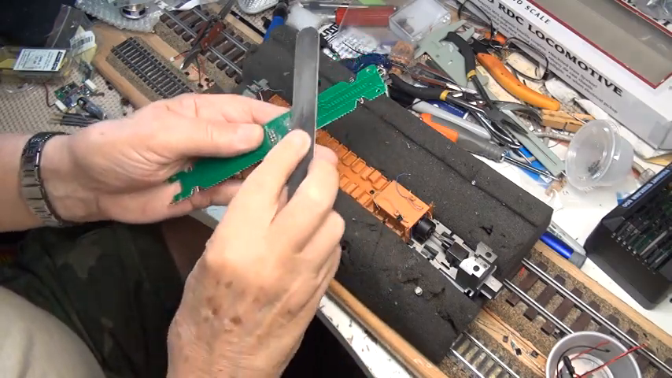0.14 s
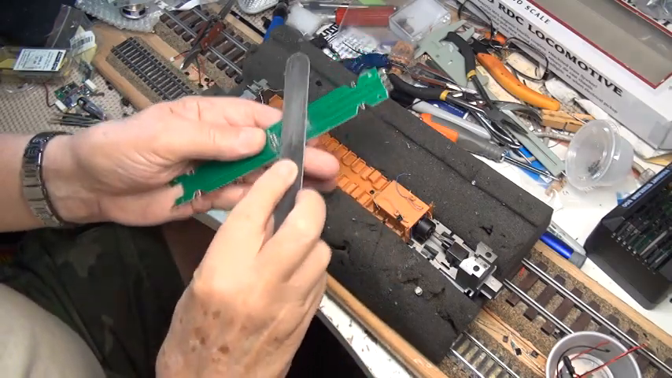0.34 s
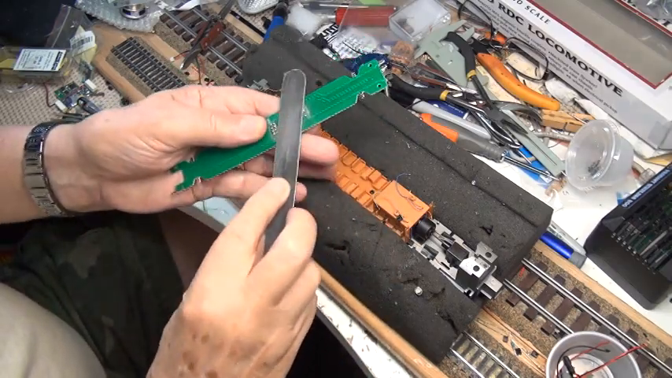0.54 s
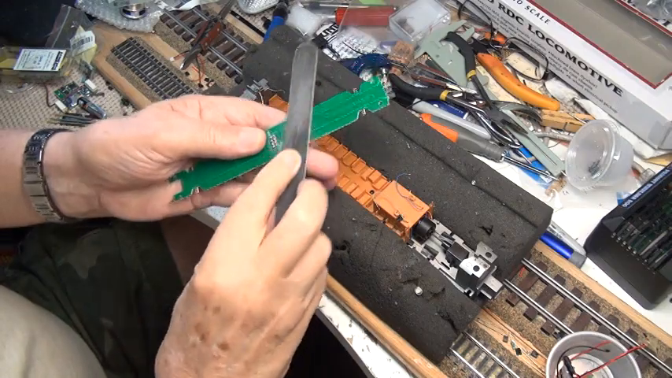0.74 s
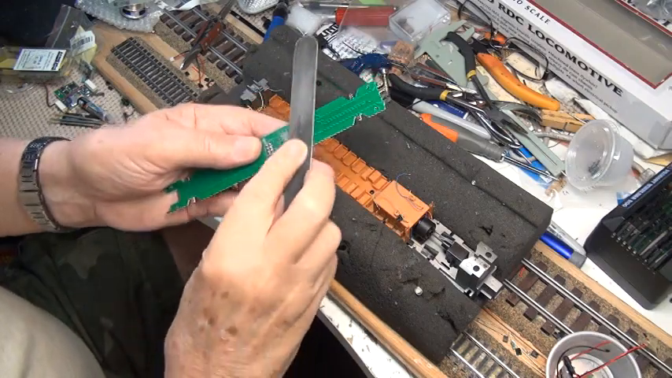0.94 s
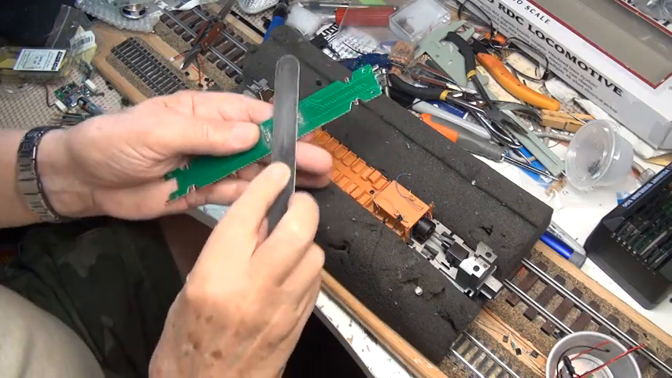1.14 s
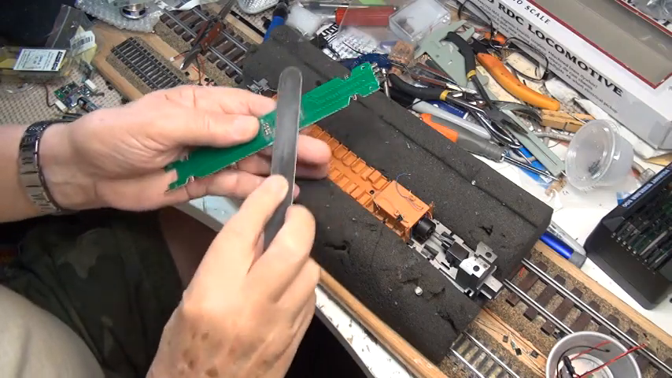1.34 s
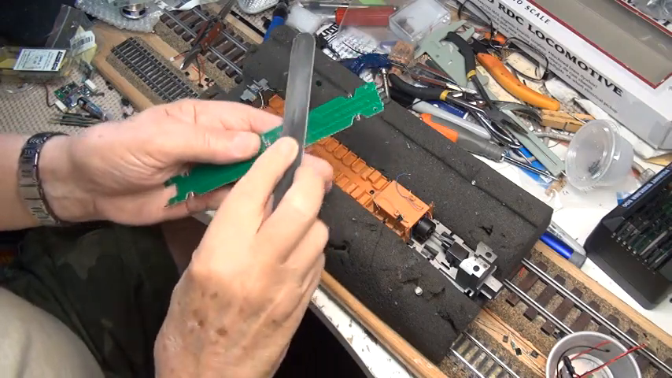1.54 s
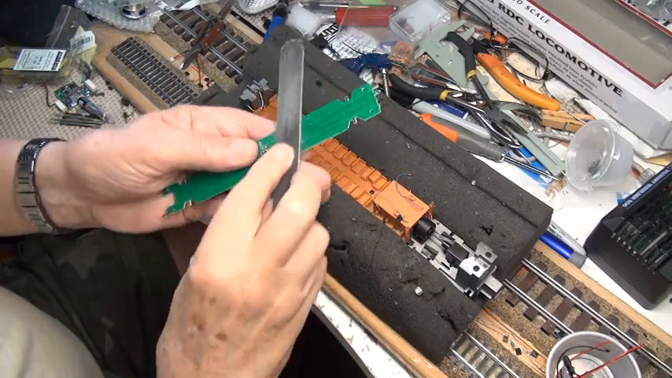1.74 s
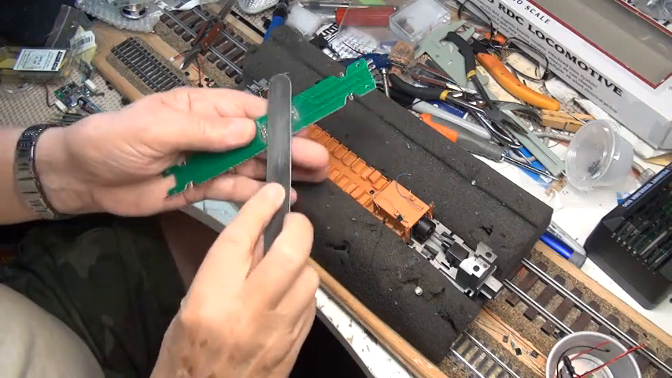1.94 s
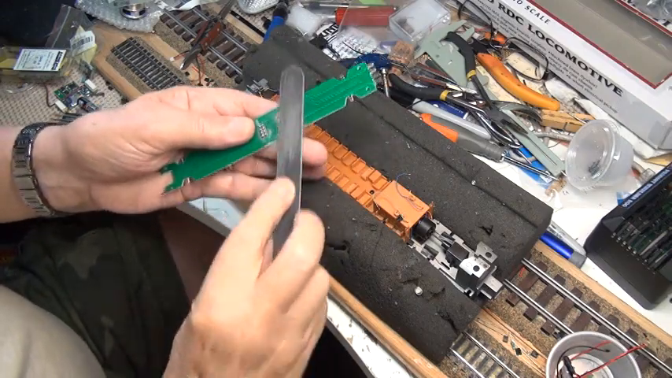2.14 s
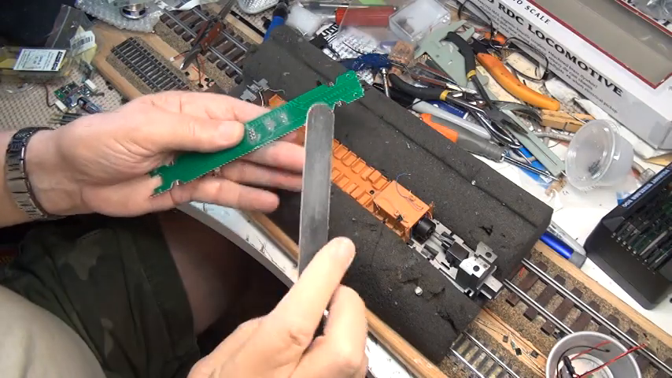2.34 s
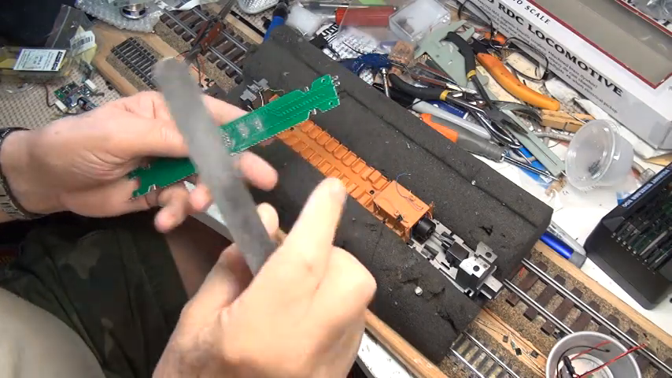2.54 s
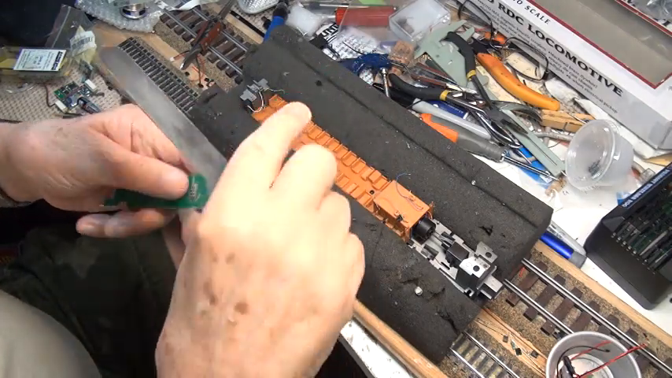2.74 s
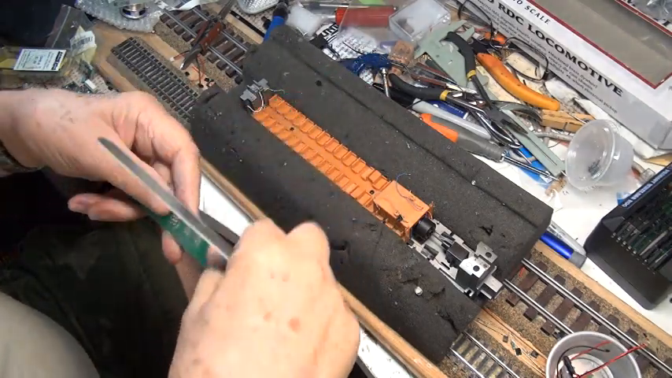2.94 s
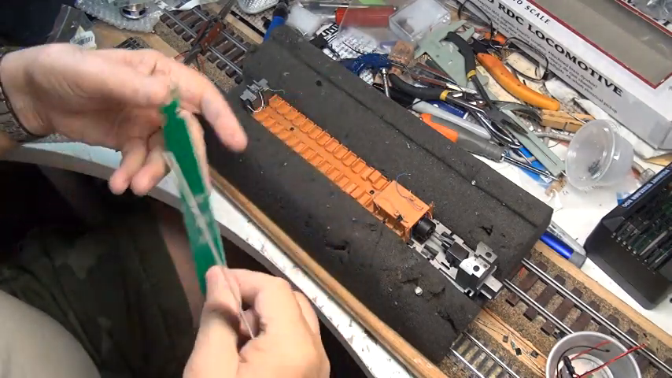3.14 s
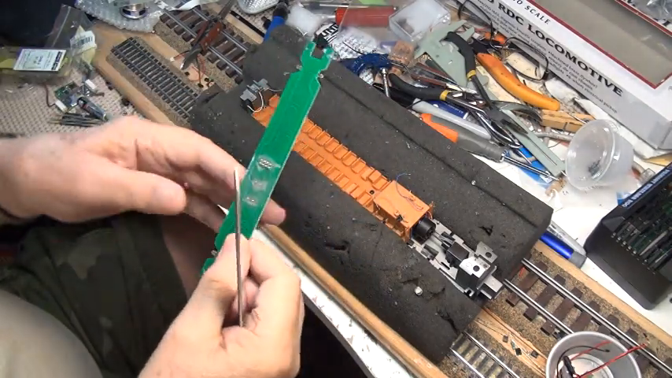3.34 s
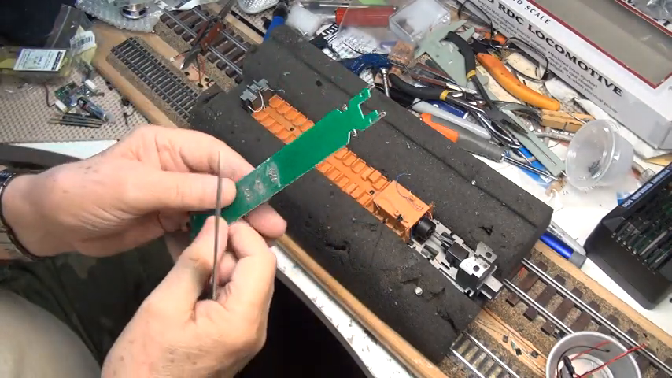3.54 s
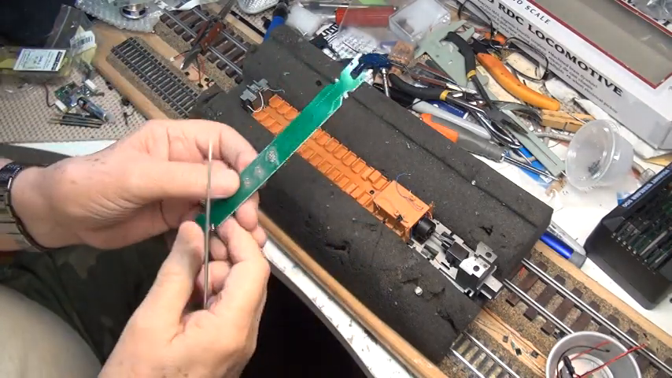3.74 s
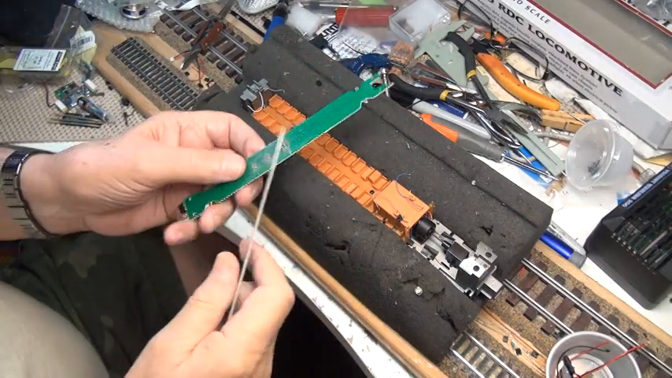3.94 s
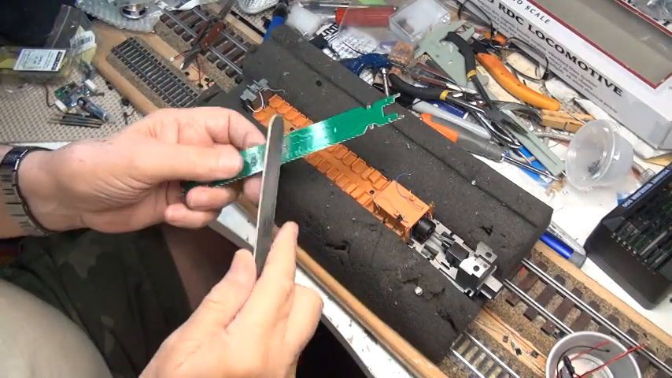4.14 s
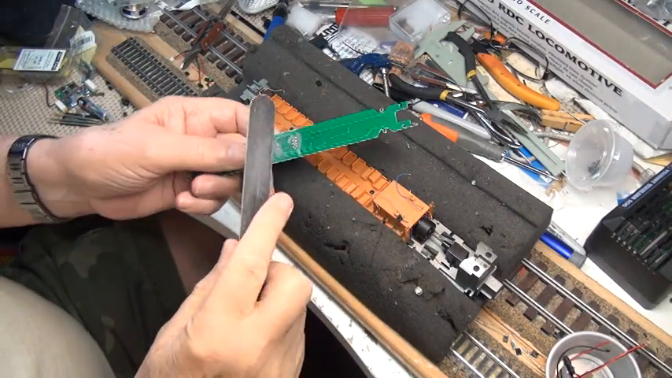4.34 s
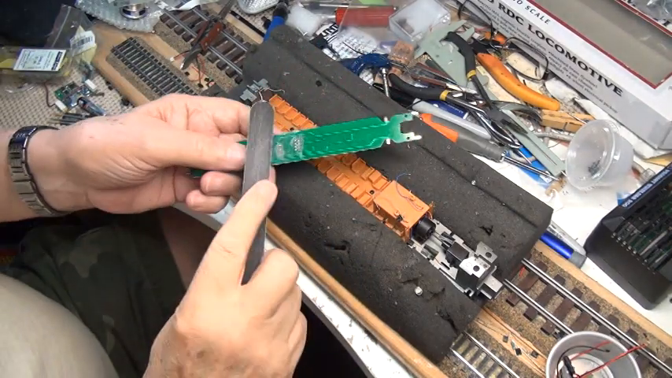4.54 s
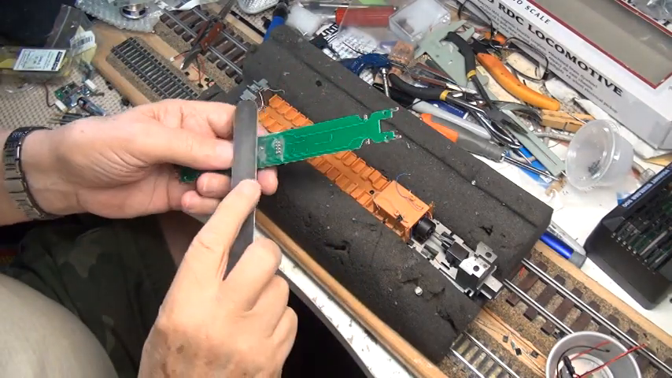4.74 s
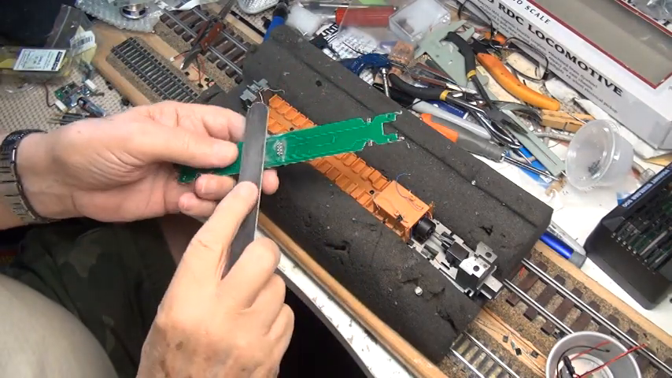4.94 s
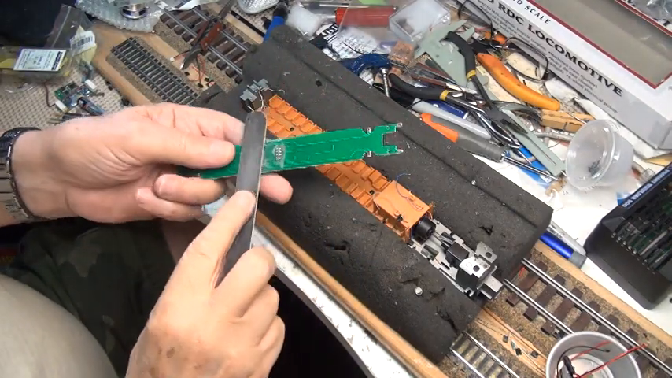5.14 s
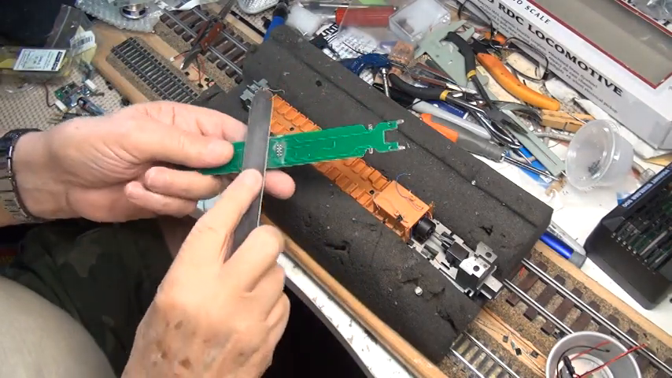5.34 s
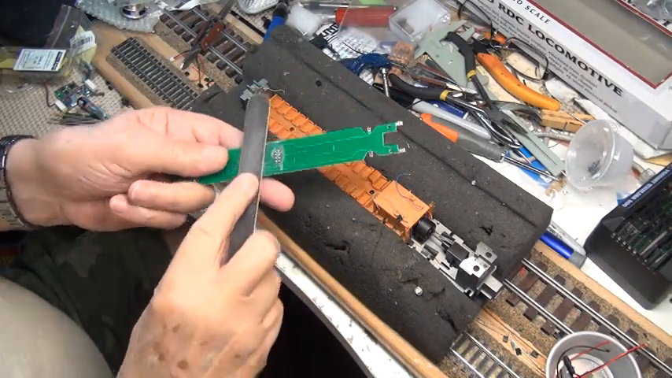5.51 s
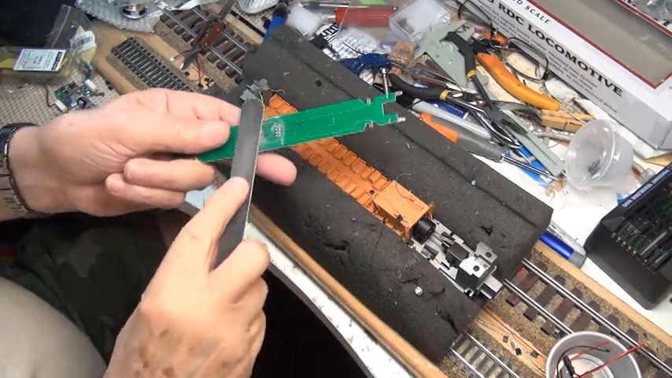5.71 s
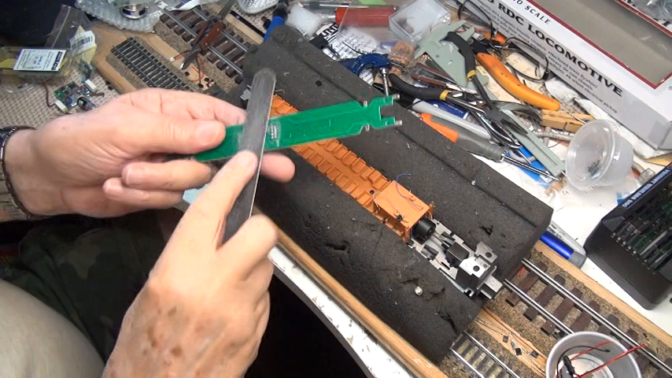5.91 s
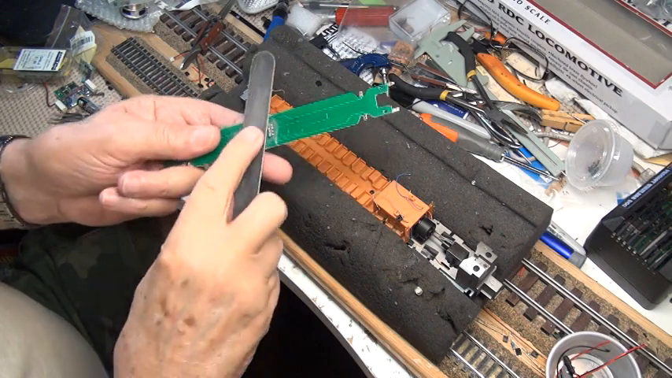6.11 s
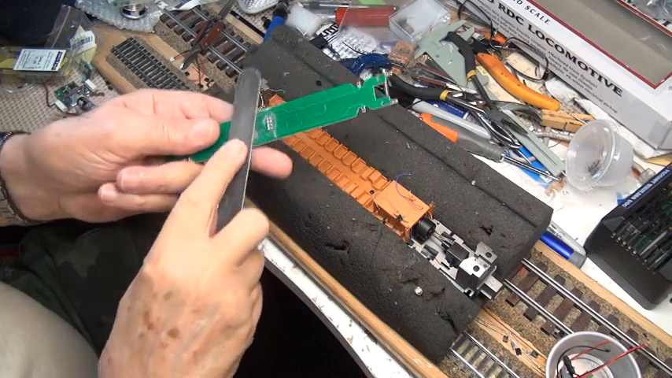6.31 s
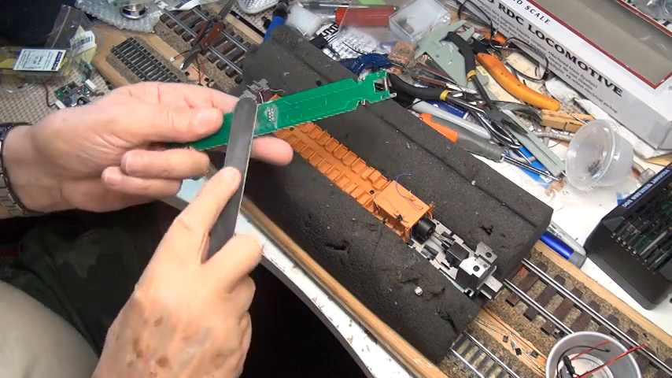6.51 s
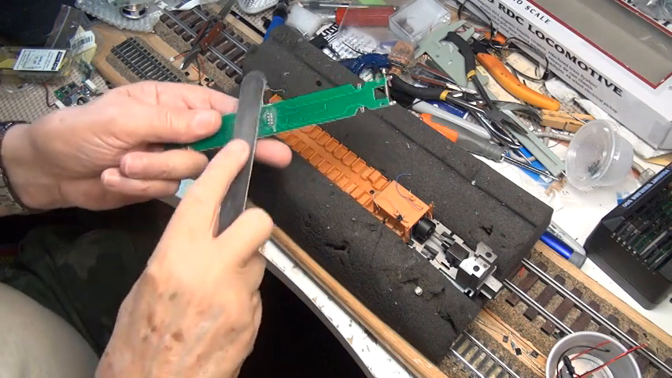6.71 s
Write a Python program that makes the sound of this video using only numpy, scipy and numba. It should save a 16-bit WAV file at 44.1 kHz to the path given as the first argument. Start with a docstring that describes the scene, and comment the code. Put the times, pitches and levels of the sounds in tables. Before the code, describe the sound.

A flat steel file rasps rapidly to and fro over wire ends on a hand-held circuit board, pauses for light handling, then resumes.

```python
"""Steel file on a circuit board

A flat steel file is rubbed to and fro over the wire ends of a hand-held circuit board, close to the listener.
Its teeth rasp as random clicks and hiss, and moving resonances make the blade's pitch glide along each stroke.
In a pause the board is turned and the file feels for a new seat, with light brushes and short noisy snags.
Echoes of fading noise make the small room; soft noise, a faint hum and a thin whine hang behind."""
import sys
import numpy as np
from scipy import signal
from scipy.fft import rfft, irfft, next_fast_len
from scipy.io import wavfile
from scipy.ndimage import uniform_filter1d, map_coordinates
from numba import njit

SR = 44100
rng = np.random.default_rng(int(sys.argv[2]) if len(sys.argv) > 2 else 0)


def persist_wave(psi):
    """Save psi, clipped to +-1, as 16-bit WAV."""
    counts = np.round(np.clip(psi, -1, 1) * 32767).astype(np.int16)
    wavfile.write(sys.argv[1], SR, np.atleast_2d(counts).T)


N = 298557  # length of the sound [samples]
REGRIP_S = 3.5  # strokes after this time use the second grip


def amp(db):
    """Turn decibels into a gain."""
    return 10 ** (np.asarray(db) / 20)


def unit(x):
    """Scale to an rms of 1."""
    return x / np.sqrt(np.mean(x ** 2) + 1e-20)


def along(points, hz):
    """Read a curve of (frequency [Hz], value) points, joined by straight lines on a log axis."""
    point_hz, values = np.transpose(points)
    return np.interp(np.log(hz + 1), np.log(point_hz + 1), values)


def clock():
    """Time of every sample [s]."""
    return np.arange(N) / SR


def wobble(rate):
    """A smooth random curve with the given number of random points a second."""
    knots = rng.standard_normal(int(N * rate / SR) + 4)
    return map_coordinates(knots, [clock() * rate])


def filtered(x, response):
    """Multiply the spectrum of x by a response of frequency."""
    size = next_fast_len(N + SR // 2)
    hz = np.fft.rfftfreq(size, 1 / SR)
    return irfft(rfft(x, size) * response(hz), size)[..., :N]


def coloured(x, spectrum, size=2048):
    """Give x the shape of a spectrum, with a filter of unit energy that never sounds ahead of its input."""
    gain = amp(along(spectrum, np.fft.rfftfreq(size, 1 / SR)))
    # folding the cepstrum puts the filter's energy as early as possible
    cepstrum = irfft(np.log(np.maximum(gain, 1e-6)))
    cepstrum[1:size // 2] *= 2
    cepstrum[size // 2 + 1:] = 0
    kernel = irfft(np.exp(rfft(cepstrum)))
    return signal.fftconvolve(x, kernel / np.linalg.norm(kernel))[:N]


@njit
def resonate(x, warp, damping):
    """A resonance whose pitch moves: a band-pass filter, with warp = tan(pi * Hz / SR)."""
    y, band, low = np.zeros(len(x)), 0., 0.
    for i in range(len(x)):
        g = warp[i]
        v = (band + g * (x[i] - low)) / (1 + g * (g + damping))
        band = 2 * v - band
        low += 2 * g * v
        y[i] = damping * v
    return y


def patchy(x, depth_db, size=256):
    """The contact shifts from wire to wire, so bands flare and fade for a few hundredths of a second."""
    bands = signal.stft(x, nperseg=size)[2]
    field = uniform_filter1d(rng.standard_normal(bands.shape), size=8, axis=0)  # smooth over frequency
    field = uniform_filter1d(field, size=9, axis=1)  # smooth over time
    return signal.istft(bands * amp(depth_db * unit(field)), nperseg=size)[1][:N]


def scatter(x, t60, gap_s):
    """A dense cloud of short echoes of unit energy, starting after a gap and fading 60 dB in t60 seconds."""
    t = np.arange(SR // 10) / SR
    cloud = rng.standard_normal(len(t)) * amp(-60 * t / t60) * (t > gap_s)
    return signal.fftconvolve(x, cloud / np.linalg.norm(cloud))[:N]


def teeth(rate, spread_db, clump_db, hiss):
    """Tiny fractures of uneven size, rate a second, over a fine sliding hiss; both swell in clumps."""
    hit = rng.random(N) < rate / SR
    sizes = amp(spread_db * np.clip(rng.standard_normal(N), -2, 2)) * rng.choice([-1, 1], N)
    grains = unit(hit * sizes) + hiss * rng.standard_normal(N)
    return unit(grains * amp(clump_db * wobble(420)))


# Strokes of the file, to and fro, so the blade's pitch rises and falls in turn:
# (start [s], end [s], relative level [dB], change of pressure from start to end [dB], pitch shift [semitones])
FILE_STROKES = [(-0.06, 0.054, -22.5, -3, 1), (0.073, 0.197, -23, 2.5, 1.5), (0.224, 0.341, -23, -4, 4.5),
                (0.349, 0.479, -23, -10, -0.5), (0.491, 0.607, -22, -4.5, -2),
                (0.618, 0.753, -23, 0.5, -1.5), (0.769, 0.883, -23.5, -5.5, 1.5), (0.892, 1.01, -21, 0, 0),
                (1.038, 1.143, -22.5, -2.5, 1), (1.159, 1.289, -22, 4.5, -1), (1.315, 1.428, -20.5, 1, 0),
                (1.442, 1.568, -21.5, -7, -1.5), (1.584, 1.701, -23, -5, -1),
                (1.715, 1.839, -22.5, 0, -0.5), (1.861, 1.98, -22.1, -6, -1), (1.992, 2.114, -26, -12, -2),
                (2.126, 2.268, -21.5, -2, 3), (5.227, 5.362, -30, 1, 1), (5.391, 5.501, -25, -3, 5),
                (5.516, 5.626, -23, -8, 1), (5.655, 5.761, -22, -7, 4), (5.774, 5.903, -20.5, -1.5, -0.5),
                (5.93, 6.033, -22, -8.5, 2), (6.055, 6.163, -21.5, 3, 0), (6.193, 6.304, -22, -9, 9),
                (6.315, 6.44, -21.5, 0, 1.5), (6.467, 6.582, -24, -16, 7), (6.599, 6.707, -21.5, -1, 2.5),
                (6.738, 6.835, -20.5, -7, 7)]
# How the file is held before and after the pause; the pitches are those before each stroke's own shift:
# (lowest blade pitch [Hz], highest blade pitch [Hz], attack [s], release [s],
#  swell from standstill to full speed [dB], extra bite of a rising stroke [dB])
HAND_GRIPS = [(918, 2260, .014, 0.026, 1, 0), (1170, 2650, .016, 0.024, 8, 1.06)]


def motion(rise_lean, fall_lean, bite_db):
    """Force on the wires, sliding speed, blade pitch and bite: the hand swings like a pendulum."""
    t = clock()
    force, speed, pitch, bite = np.zeros(N), np.zeros(N), np.full(N, 1500.), np.ones(N)
    for k, (start, end, level_db, change_db, semitones) in enumerate(FILE_STROKES):
        low_hz, high_hz, attack_s, release_s, swell_db, rising_db = HAND_GRIPS[int(start > REGRIP_S)]
        way = (-1) ** k  # +1 when the pitch rises, -1 when it falls
        on = (t > start) & (t < end)
        u = (t[on] - start) / (end - start)
        speed[on] = np.sin(np.pi * u)  # relative: 1 in the middle of every stroke
        # the teeth grip at once and let go gradually as the hand turns round
        grip = np.minimum((t[on] - start) / attack_s, 1) ** 0.7
        let_go = np.minimum((end - t[on]) / release_s, 1) ** 0.97
        force[on] = grip * let_go * amp(level_db + change_db * (u - 0.5) + swell_db * (speed[on] - 1))
        # the free length of the blade shrinks on one stroke and grows on the next
        travel = (1 - way * np.cos(np.pi * u)) / 2
        seat = 2 ** (semitones / 12)
        lean = rise_lean if way > 0 else fall_lean
        pitch[on] = seat * low_hz * (high_hz / low_hz) ** travel * (1 + lean * speed[on])
        bite[on] = amp(bite_db + way * rising_db)
    return force, speed, pitch, bite


# Bending modes of the blade, a steel bar: (pitch ratio, strength, relative width)
BLADE_MODES = [(1, 2.98, 0.11), (2.8, 1.6, 0.072), (5.4, 0.19, 0.032)]
# Colour of the rasp before the pause: (frequency [Hz], relative level per Hz [dB])
FIRST_COLOUR = [(450, -48), (800, -27), (1270, -13.3), (1560, -25.5), (1970, -13.5), (3400, -15),
                (5600, -3.5), (6900, 0), (7900, -6.5), (9400, 2.5), (11500, -4), (14500, -9), (15400, -25)]
# Colour of the rasp after the pause: (frequency [Hz], relative level per Hz [dB])
SECOND_COLOUR = [(450, -40), (900, -22.5), (1380, -11.5), (1600, -19.5), (2050, -10), (2800, -15),
                 (3700, -6), (4600, -9), (6100, 1), (8000, -3), (8800, 1.5), (11500, -2.5), (14400, -8.5),
                 (15400, -21)]


def filing():
    """The teeth cut fastest in the middle of each stroke; the blade rings at the pitch of its free length."""
    force, speed, pitch, bite = motion(rise_lean=0.0065, fall_lean=-0.015, bite_db=-0.16)
    # the file stays on the wires and creeps faintly while the hand turns round
    force = force + amp(-20.0) * uniform_filter1d(force, size=SR // 20)
    cuts = teeth(1800 + 2500 * speed, spread_db=3.0, clump_db=1.5, hiss=0.68)
    rasp = 1.5 * cuts
    for ratio, strength, width in BLADE_MODES:
        ring = resonate(cuts, np.tan(np.pi * ratio * pitch / SR), width)
        rasp = rasp + strength * amp(1.3 * wobble(45)) * ring
    # a deeper bite shakes the board more and fills out the low part of the rasp
    low_part = filtered(rasp, lambda hz: 1 / (1 + (hz / 4500) ** 4))
    rasp = rasp + (bite - 1) * low_part
    rasp = patchy(rasp, depth_db=1.94)
    # the board's many damped modes ripple the colour
    rasp = rasp + 0.31 * scatter(rasp, t60=0.024, gap_s=0.0006)
    rasp = unit(rasp) * force * amp(0.41 * wobble(60))
    first = clock() < REGRIP_S
    before_pause = amp(-0.7) * coloured(rasp * first, FIRST_COLOUR)
    after_pause = amp(-1.1) * coloured(rasp * ~first, SECOND_COLOUR)
    return before_pause + after_pause


# Light brushes of file and fingers on the board: (start [s], end [s], relative level [dB])
LIGHT_BRUSHES = [(2.23, 2.294, -42.5), (2.462, 2.537, -55), (2.515, 2.586, -45.5), (2.58, 2.633, -47.5),
                 (2.877, 2.99, -58), (3.532, 3.77, -64.5), (3.786, 3.934, -60), (3.931, 3.974, -52.5),
                 (4.096, 4.15, -52), (4.238, 4.385, -54.5), (4.49, 4.523, -49.5), (4.77, 4.92, -49),
                 (4.939, 4.994, -35), (4.992, 5.125, -54.5), (5.124, 5.183, -40.5)]
# Colour of a light touch, also used by the snags: (frequency [Hz], relative level per Hz [dB])
TOUCH_COLOUR = [(600, -36), (1000, -27), (1370, -18), (1630, -15.5), (2070, -3), (2800, -11.5), (3640, 0.5),
                (5000, -8), (6400, 4.5), (7950, -5.5), (9800, 3.5), (12000, -5), (14000, -7), (15200, -45)]
# Colour of the board's knock, also used by the snags: (frequency [Hz], relative level per Hz [dB])
BOARD_COLOUR = [(500, -38), (1000, -14), (1350, -4), (1650, -9), (2050, 4.5), (2800, -8), (3600, -3),
                (5000, -10), (6500, -5.5), (9000, -16), (15000, -32)]


def brushes():
    """Barely pressed, the file skims the wire tips with sparse grit; a firmer touch also sounds the board."""
    t = clock()
    level = np.zeros(N)
    for start, end, level_db in LIGHT_BRUSHES:
        u = np.clip((t - start) / (end - start), 0, 1)
        level += amp(level_db) * np.sqrt(np.abs(np.sin(np.pi * u)))
    grit = teeth(1200, spread_db=3.5, clump_db=2.5, hiss=0.4)
    touch = level * amp(1.2 * wobble(90)) * unit(patchy(grit, depth_db=1.0))
    firmness = (level / level.max()) ** 0.69
    return coloured(touch, TOUCH_COLOUR) + amp(-4) * coloured(touch * firmness, BOARD_COLOUR)


# The file taps or snags on a wire end:
# (time [s], relative level of the steel tick [dB], relative level of the board's knock [dB])
WIRE_SNAGS = [(0.46, -16, -42), (0.707, -31, -34), (0.731, -25, -25), (0.85, -12.5, -42), (1.553, -17, -32),
              (1.946, -15.5, -43), (2.199, -26, -38), (4.663, -33.5, -25.5), (4.825, -32, -43),
              (4.850, -34, -30), (4.887, -29, -28), (5.150, -21.5, -41), (5.162, -18.5, -40),
              (5.245, -18, -42), (5.328, -20.5, -38), (5.384, -22.5, -40), (5.404, -14.5, -41),
              (5.429, -11, -35)]


def snags():
    """Each catch is a brief chatter that ticks in the steel and knocks the board."""
    t = np.arange(SR // 50) / SR
    fade_s = np.array([[0.012], [0.022]])  # time to fall 60 dB: tick, knock
    ticks, knocks = np.zeros(N), np.zeros(N)
    for time_s, tick_db, knock_db in WIRE_SNAGS:
        chatter = rng.choice([-1, 1], (2, len(t))) * amp(-60 * t / fade_s)
        first = round(time_s * SR)
        ticks[first:][:len(t)] += amp(tick_db - 2.5) * chatter[0]
        knocks[first:][:len(t)] += amp(knock_db - 4) * chatter[1]
    return coloured(ticks, TOUCH_COLOUR) + coloured(knocks, BOARD_COLOUR)


# Left-right difference of the near reflections: (frequency [Hz], side gain [dB])
NEAR_WIDTH = [(700, -20), (1300, -33), (2400, -41), (4400, -16.5), (8100, -12.5), (15000, -14)]


def spread(x):
    """Near reflections reach the two microphones a little differently."""
    echoes = scatter(x, t60=0.04, gap_s=0.003)
    side = filtered(echoes, lambda hz: amp(along(NEAR_WIDTH, hz)))
    return np.array([x + side, x - side])


# How long the room rings: (frequency [Hz], time to fall 60 dB [s])
ROOM_DECAY = [(300, .3), (2000, .24), (7000, .2), (14000, .15)]
# Left-right difference of the room's answer: (frequency [Hz], side gain [dB])
ROOM_SIDE = [(1000, -20), (2800, -20), (5000, -9)]


def room(x):
    """Bench and walls answer, each frequency dying at its own speed; both microphones hear the lows alike."""
    hz, t, noise = signal.stft(rng.standard_normal((2, SR // 2)), SR, nperseg=256)
    fade = amp(-60 * t / along(ROOM_DECAY, hz)[:, None])
    tail = signal.istft(noise * fade, SR, nperseg=256)[1]
    mid, side = signal.fftconvolve(x[None], tail / np.linalg.norm(tail[0]), axes=1)[:, :N]
    side = filtered(side, lambda hz: amp(along(ROOM_SIDE, hz)))
    return np.array([mid + side, mid - side])


# Colour of the room noise: (frequency [Hz], relative level per Hz [dB])
AIR_COLOUR = [(25, -37), (40, -32), (55, -23), (88, -16.5), (130, -17.5), (330, -14.5), (720, -10.5),
              (860, -7.5), (1300, -10), (3000, -19), (5200, -22.5), (6200, -23.5), (7300, -21.5),
              (8200, -31.5), (10500, -30), (13000, -29.5), (14000, -53)]
# Left-right difference of the room noise: (frequency [Hz], side gain [dB])
AIR_SIDE = [(30, -19), (70, -30), (130, -30), (290, -25), (640, -17.5), (1400, -11), (3100, -7),
            (7000, -11)]
# Faint hum and thin whine, around which the level wavers: (frequency [Hz], rms level [dB])
HUM_AND_WHINE = [(90, -77), (201, -76), (268.6, -73.5), (359.5, -72), (479.1, -72), (861.3, -55)]


def background():
    """Filtered room noise with sine tones for a faint hum and a thin, slightly unsteady whine."""
    mid, side = (amp(-50.5) * unit(coloured(noise, AIR_COLOUR)) for noise in rng.standard_normal((2, N)))
    side = filtered(side, lambda hz: amp(along(AIR_SIDE, hz)))
    # a clock that runs slightly unevenly makes the pitch drift
    drift = clock() + np.cumsum(0.0015 * wobble(7)) / SR
    tones = np.zeros(N)
    for hz, level_db in HUM_AND_WHINE:
        tones += amp(level_db) * np.sqrt(2) * np.sin(2 * np.pi * (hz * drift + rng.random()))
    tones = tones * amp(0.9 * wobble(2.513))
    # the whine stands to the left; the low hum reaches both microphones alike
    side = side + filtered(tones, lambda hz: 0.4 * (hz > 600))
    return np.array([mid + tones + side, mid + tones - side])


def scene():
    """The work in the hands, a touch louder on the left, with the room's answer and its steady noise."""
    work = filing() + brushes() + snags()
    balance = amp(np.array([[0.2], [-0.2]]))  # left, right
    return spread(work) * balance + amp(-13) * room(work) + background()


def record(dry):
    """The sound holds nothing from 15300 Hz upwards."""
    return filtered(dry, lambda hz: hz < 15300)


dry = scene()
out = record(dry)
persist_wave(out)
```